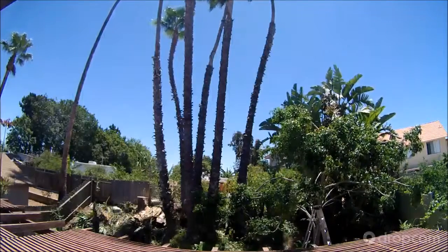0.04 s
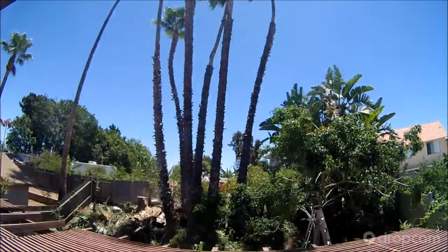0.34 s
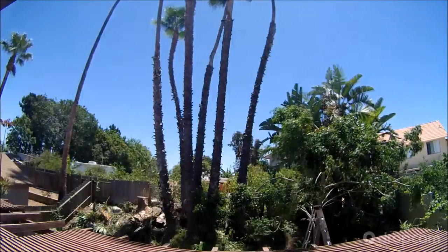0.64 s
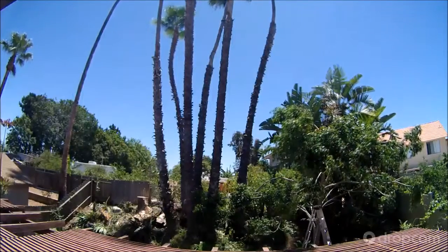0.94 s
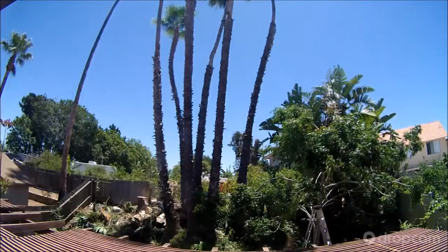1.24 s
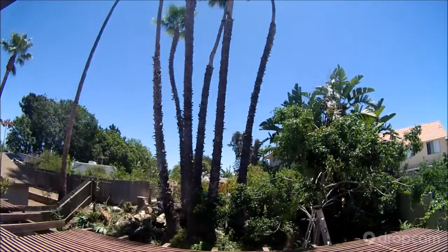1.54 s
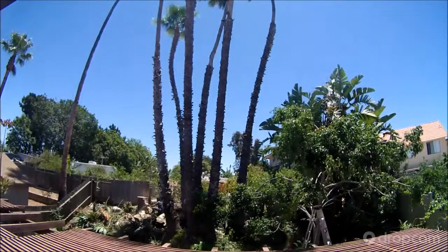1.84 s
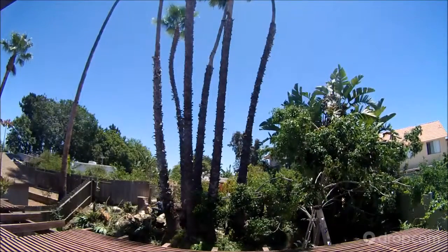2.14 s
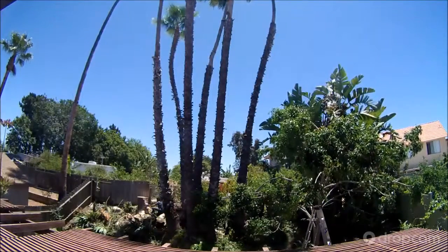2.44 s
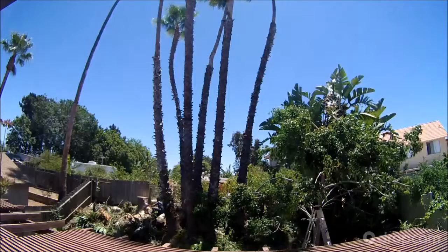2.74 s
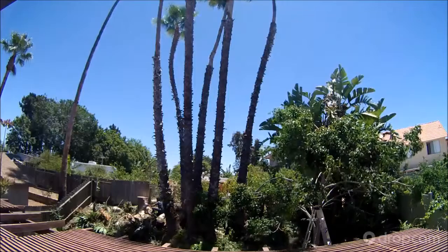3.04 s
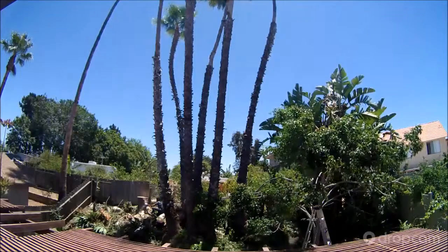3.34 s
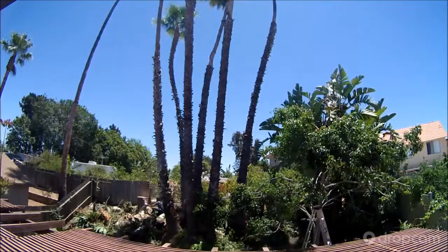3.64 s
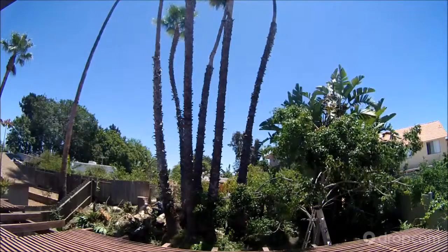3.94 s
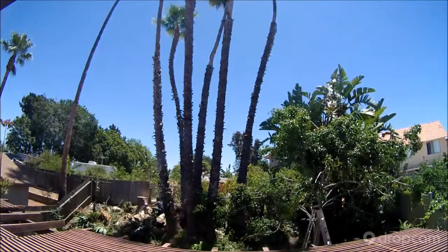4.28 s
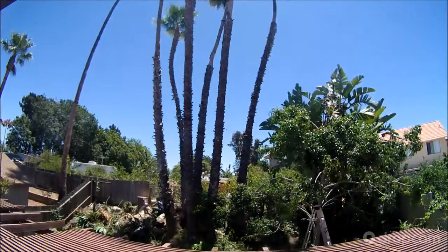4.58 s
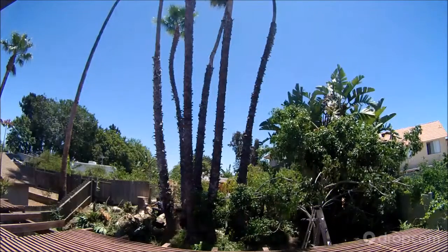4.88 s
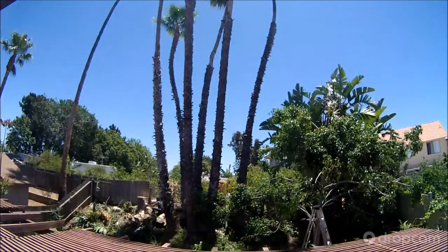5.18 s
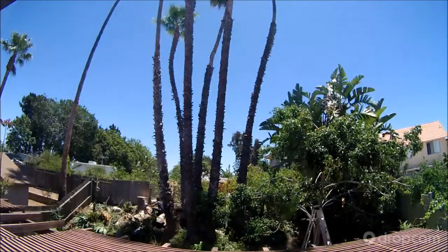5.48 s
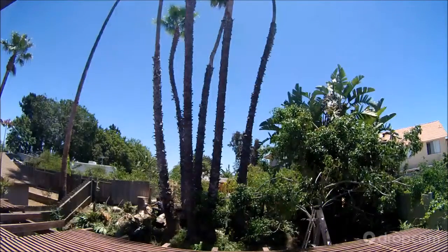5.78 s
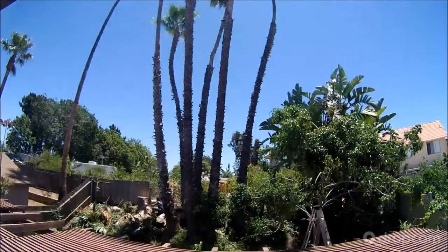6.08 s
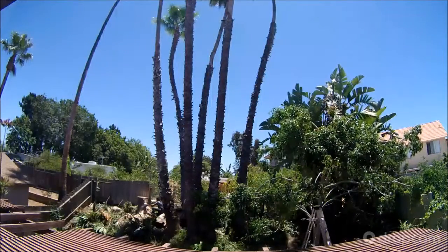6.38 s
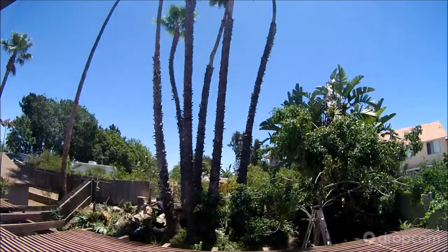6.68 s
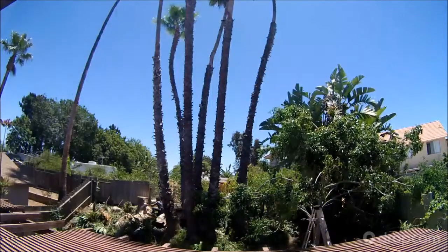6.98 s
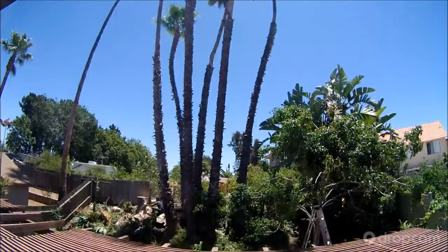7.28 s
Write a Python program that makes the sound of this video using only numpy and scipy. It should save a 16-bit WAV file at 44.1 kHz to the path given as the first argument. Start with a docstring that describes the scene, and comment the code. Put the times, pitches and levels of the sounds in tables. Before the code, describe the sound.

After a moment of faint outdoor air, a two-stroke chainsaw bursts in at high revs from some way off. Its pitch drops at once as the chain bites into wood, then it picks up and bogs down again and again, growing louder. The engine buzzes, rasps and sputters over the tearing of the chain. The microphone stays in one spot in a back yard, where fences and walls add a short echo.

```python
"""Chainsaw in a back yard

Heard from some way off, a two-stroke saw bursts in at high revs, bogs down in the wood and picks up
again and again. Each firing is a pop in the muffler: the low orders sing, the upper ones rasp, and the
chain tears through the wood. On the way to the microphone, fences, walls and trees scatter the sound
and smear it whenever the speed changes quickly."""
import sys
import numpy as np
from scipy import signal
from scipy.fft import rfft, irfft, next_fast_len
from scipy.io import wavfile
from scipy.ndimage import uniform_filter1d, map_coordinates

SR = 44100
rng = np.random.default_rng(int(sys.argv[2]) if len(sys.argv) > 2 else 0)


def master_out(mix):
    """Clip the mix to full scale and print it as 16-bit PCM to the path in sys.argv[1]."""
    frames = np.transpose(np.atleast_2d(mix))
    ceiling = np.clip(frames, -1, 1)
    pcm = np.round(ceiling * 32767).astype(np.int16)
    wavfile.write(sys.argv[1], SR, pcm)


N = 327222

START_S, ATTACK_S, FLYWHEEL_S, CRUISE_HZ = 0.4, 0.039, .085, 160
# Crank speed, one firing a turn: (time [s], firing rate [Hz])
CRANK_SPEED = [(0.4, 213.9), (0.63, 154.3), (0.89, 132.8), (1.31, 148.1), (1.7, 134.0), (1.94, 143.7),
               (2.25, 144.4), (2.77, 171.5), (3.13, 176.7), (3.61, 156.5), (3.88, 150.7), (4.23, 167.8),
               (4.34, 156.8), (4.45, 124.8), (4.66, 139.3), (4.84, 136.8), (5.0, 144.7), (5.18, 142.5),
               (5.34, 164.1), (5.46, 170.9), (5.73, 169.8), (6.08, 191.3), (6.27, 197.0), (6.5, 194.3),
               (6.62, 177.3), (6.83, 163.4), (7.08, 176.9), (7.24, 150.9), (7.42, 144.9)]
# Base level of the saw from across the yard, swelling through the first cut: (time [s], level [dB])
SAW_LEVEL = [(0.43, -60.5), (0.8, -58.5), (1.1, -53.0), (1.5, -50.5), (1.8, -48), (2.1, -45.5),
             (2.35, -44.5), (2.7, -41), (3.25, -40), (3.65, -42), (4.3, -42), (4.7, -45.0), (4.95, -43),
             (5.15, -43.5), (5.35, -41.0), (5.7, -41), (5.9, -38), (6.6, -38.0), (7.1, -39), (7.42, -41.5)]
def chainsaw():
    """The saw, some way off: all its parts follow one crank and one base level."""
    speed = smoothed(curves(CRANK_SPEED)[0], FLYWHEEL_S)
    octaves = np.log2(speed / CRUISE_HZ)  # the parts grow louder with the revs, in dB per octave
    level_db, = curves(SAW_LEVEL)
    rough = roughness()
    turns = crank(speed, rough)
    note = exhaust_note(turns, rough, order_levels(speed, level_db + 8 * octaves, rough))
    rasp = amp(level_db - 2.21 + .8 * octaves) * exhaust_rasp(turns, rough)
    cutting = amp(level_db - 5.5 + 6.5 * octaves) * chain(turns, rough)
    gas = amp(level_db + 3) * gas_rush(turns, rough)
    low_end = amp(level_db - 28 + 9 * octaves) * rumble()
    running = np.clip((np.arange(N) / SR - START_S) / ATTACK_S, 0, 1)
    return running * (note + rasp + cutting + gas + low_end)


# The chain bites deep into the wood: (middle [s], length [s], added roughness [0-1])
DEEP_BITES = [(.63, 0.45, .38), (1.528, 0.22, .12), (2.422, 0.48, .21), (3.456, 0.25, 0.14),
              (4.43, 0.54, .34), (5.299, 0.24, .26), (5.75, 0.57, 0.07), (6.643, 0.27, 0.23),
              (7.234, 0.2, 0.36)]
def roughness(free_running=.25):
    """Uneven burning, 0-1: it swells and fades with each bite."""
    t = np.arange(N) / SR
    bites = sum(depth * np.exp(-(2 * (t - middle) / length) ** 2)
                for middle, length, depth in DEEP_BITES)
    return np.clip(free_running + bites, .02, 1)


def crank(speed, rough):
    """Turns of the crank; its speed wanders a little and uneven burning shakes it."""
    shake = .0011 * wobble(16) + .012 * rough ** 2 * wobble(60)
    return np.cumsum(speed * (1 + shake)) / SR


# Broad colour of the exhaust note at the microphone: (frequency [Hz], gain [dB])
NOTE_COLOUR = [(130, -24.5), (190, -17), (250, -17.5), (285, -9.5), (320, -19.5), (380, -2.5), (440, -16),
               (560, -11), (640, -13.5), (780, -4), (900, -16.5), (1200, -14)]
# Narrow peaks and notches of muffler and yard: (frequency [Hz], width [Hz], gain [dB])
HONK_RESONANCES = [(350.5, 4.9, 7), (483, 12, -13), (503.1, 18.4, 15.5), (595.6, 15, -11), (636.6, 35, 11),
                   (681.7, 6.3, 9), (728.4, 19.5, 12), (780, 24, 6.5), (866, 7.7, 12)]
# Lift of the band around the main honk: (time [s], gain [dB])
HONK_LIFT = [(.45, -3), (.9, 4), (1.2, 6), (1.4, 6), (1.7, 0.5), (2.22, 2.5), (2.45, -3), (2.9, -2.5),
             (3.6, 1.5), (3.85, .5), (4.3, -2), (4.55, 4.5), (4.85, 9.5), (5.1, 6), (5.3, -4), (5.6, -2.5),
             (6.4, 1.5), (6.65, -5), (7.2, -4), (7.42, 2.5)]
def order_levels(speed, drive_db, rough, honk_hz=770, spread_hz=200, ring_up_s=0.023, flutter_db=7.5):
    """dB of the six low orders: each flutters, and honks or fades as it glides through a resonance."""
    honk_db, = curves(HONK_LIFT)
    levels = []
    for order in range(1, 7):
        hz = order * speed
        band_db = honk_db * np.exp(-((hz - honk_hz) / spread_hz) ** 2)
        colour_db = along(NOTE_COLOUR, hz) + lifted(HONK_RESONANCES, hz) + band_db
        levels.append(drive_db + smoothed(colour_db, ring_up_s) + flutter_db * rough * wobble(18))
    return levels


def exhaust_note(turns, rough, orders_db):
    """The low orders as clean tones; they sputter and lose their pitch when the engine labours."""
    tones = 0
    for order, db in enumerate(orders_db, 1):
        phase = 2 * np.pi * (order * turns + rng.random()) + 2.2 * rough ** 2 * wobble(50)
        sputter = 1 + (.08 + .6 * rough) * np.tanh(wobble(48))
        tones = tones + amp(db) * sputter * np.sqrt(2) * np.sin(phase)
    return yard(tones, near_db=-32, far_db=-22, near_t60=.15)


# Upper exhaust orders from across the yard: (frequency [Hz], relative level [dB])
RASP_SPECTRUM = [(800, 5), (1030, 1.5), (1170, -3.5), (1330, -3), (1470, -5.5), (1620, 0.5), (1900, -0.5),
                 (2500, -3.5), (2800, -12), (3200, -7.5), (4000, -20.5), (5200, -39), (7400, -45.5)]
# Muffler and housing resonances: (frequency [Hz], width [Hz], gain [dB])
SHELL_RESONANCES = [(1134, 33, 8), (1555, 83, 3.5), (1884, 95, 3.5), (2115, 80, 6), (2514, 70, 5)]
def exhaust_rasp(turns, rough, bite_db=1.5, grind_db=4):
    """Pops and turbulent puffs ring the muffler shell; rough running swells the rasp in short bursts."""
    puff_share = rough ** 3
    firings = pops(turns, rough, jitter_turns=.003, scatter_db=2.5)
    turbulence = filtered(puffs(turns, fade=1.6), lambda hz: hz > 900)
    blast = np.sqrt(1 - puff_share) * firings + np.sqrt(puff_share) * turbulence
    rasp = filtered(blast, lambda hz: amp(along(RASP_SPECTRUM, hz) + lifted(SHELL_RESONANCES, hz)))
    heard = shifting_paths(rasp, near_db=7, far_db=-6, near_t60=.1, sway=.7)
    return heard * amp(rough * (bite_db + grind_db * wobble(50)))


# The chain in the wood, its top dull at this distance: (frequency [Hz], relative level [dB])
CHAIN_SPECTRUM = [(1500, -8), (2800, -6.5), (4000, -4), (4600, -8.5), (5050, -4.5), (5400, -13.5),
                  (5900, -17), (7000, -25.5), (7500, -39)]
def chain(turns, rough):
    """Cutters and drive links clatter with every power stroke and hiss as they bite."""
    clatter = pops(turns, rough, jitter_turns=.009, scatter_db=6)
    hiss = (.15 + rough) * puffs(turns, fade=2)
    cutting = coloured(clatter + hiss, CHAIN_SPECTRUM)
    heard = shifting_paths(cutting, near_db=11, far_db=4.0, near_t60=0.19, sway=0.96)
    return heard * amp(0.98 * wobble(45))


# Gas rushing in the muffler: (frequency [Hz], relative level [dB])
GAS_SPECTRUM = [(150, -20), (280, -6.5), (390, -10), (450, -6), (520, -4.5), (660, -2.5), (765, 9),
                (860, -1.5), (1100, -13), (2500, -36)]
def gas_rush(turns, rough):
    """Gas puffs through the muffler once a turn, louder as the engine labours."""
    return rough ** 2 * coloured(puffs(turns, fade=2.3), GAS_SPECTRUM)


# Low end of the saw at the microphone: (frequency [Hz], relative level [dB])
RUMBLE_SPECTRUM = [(20, -22.5), (45, -6.5), (90, -8.5), (140, -4.5), (300, -20.5), (800, -59)]
def rumble(swing_db=3):
    """Low noise wavers under the exhaust note."""
    return amp(swing_db * wobble(15)) * coloured(rng.standard_normal(N), RUMBLE_SPECTRUM)


def pops(turns, rough, jitter_turns, scatter_db, first_order=7, last_order=50):
    """One sharp pulse a turn, made of the given orders; rough running scatters its timing and size."""
    firing = np.round(turns).astype(int)
    late, size = rng.standard_normal((firing[-1] + 1, 2))[firing].T
    angle = np.pi * (turns + jitter_turns * rough * late)
    # closed form of a sum of equally strong harmonics
    pulse = (np.sin((2 * last_order + 1) * angle) - np.sin((2 * first_order - 1) * angle)) / np.sin(angle)
    return unit(pulse * amp(scatter_db * rough * size))


def puffs(turns, fade):
    """Noise that bursts as the exhaust port opens and fades through each turn."""
    return unit(rng.standard_normal(N) * np.exp(-fade * (turns % 1)))


def shifting_paths(x, near_db, far_db, near_t60, sway, wall_s=.038, wall_db=-6.5):
    """The saw moves in the hands, so its sound drifts between two sets of paths to the microphone."""
    angle = sway * wobble(22)
    one, other = (yard(x, near_db, far_db, near_t60) for _ in range(2))
    heard = np.cos(angle) * one + np.sin(angle) * other
    # while the speed glides, the house wall's echo lags in pitch and beats against the direct sound
    echo = amp(wall_db) * np.pad(heard, (round(wall_s * SR), 0))[:N]
    return unit(heard + echo)


# Tail from the houses beyond the yard: (frequency [Hz], time to fall 60 dB [s])
FAR_DECAY = [(150, 0.38), (800, 0.7), (3000, 0.33), (7000, 0.033)]
def yard(x, near_db, far_db, near_t60):
    """Direct sound, quick scatter from nearby trunks and fences, and a tail from the houses beyond."""
    hz, t, noise = signal.stft(rng.standard_normal(SR // 2), SR, nperseg=256)
    near = unit(amp(-60 * t / near_t60) * (t > 0))
    build_up = 1 - np.exp(-t / 0.082)
    far = unit(amp(-60 * t / along(FAR_DECAY, hz)[:, None]) * build_up)
    envelope = np.hypot(amp(near_db) * near, amp(far_db) * far)
    tail = signal.istft(noise * envelope, SR, nperseg=256)[1]
    return x + signal.fftconvolve(x, tail / np.sqrt(len(tail)))[:N]


# Open air around the microphone: (frequency [Hz], relative level [dB])
AIR_SPECTRUM = [(15, -57.5), (25, -32), (350, -15), (443, -10), (488, -12), (524, -12.5), (5640, -23.5),
                (7320, -53), (9520, -70), (16100, -120)]
# Loudness of that air: (time [s], level [dB])
AIR_LEVEL = [(0, -68), (.13, -68), (.27, -72), (.45, -68)]
def outdoor_air():
    """A faint wash of noise that dips briefly before the saw comes in."""
    air_db, = curves(AIR_LEVEL)
    return amp(air_db) * coloured(rng.standard_normal(N), AIR_SPECTRUM)


def amp(db):
    """Decibels to gain."""
    return 10 ** (np.asarray(db) / 20)


def unit(x):
    """Scale to rms 1."""
    return x / np.sqrt(np.mean(x ** 2) + 1e-20)


def along(points, hz):
    """(Hz, value) points read on a log axis."""
    frequencies, values = np.transpose(points)
    return np.interp(np.log(hz + 1), np.log(frequencies + 1), values)


def lifted(resonances, hz):
    """dB of lift at hz from (Hz, width Hz, dB) peaks and notches."""
    return sum(db / (1 + (2 * (hz - centre) / width) ** 2) for centre, width, db in resonances)


def curves(rows):
    """One value per sample for each column after the time."""
    times, *columns = np.transpose(rows)
    return [np.interp(np.arange(N) / SR, times, column) for column in columns]


def smoothed(x, seconds):
    """Running mean over the given time."""
    return uniform_filter1d(x, size=max(1, round(seconds * SR)), mode="nearest")


def wobble(per_s):
    """A smooth random curve, per_s knots a second."""
    knots = rng.standard_normal(int(N * per_s / SR) + 4)
    return map_coordinates(knots, [np.arange(N) * per_s / SR])


def filtered(x, response):
    """x through a gain given as a function of frequency."""
    size = next_fast_len(N + SR // 2)
    return irfft(rfft(x, size) * response(np.fft.rfftfreq(size, 1 / SR)), size)[:N]


def coloured(x, spectrum):
    """x shaped by a (Hz, dB) spectrum, at rms 1."""
    return unit(filtered(x, lambda hz: amp(along(spectrum, hz))))


def scene():
    """The saw over faint outdoor air, in mono from one spot in the yard."""
    return (chainsaw() + outdoor_air())[None]


def record(dry, top_hz=7400):
    """The camera's microphone track keeps nothing above its band limit."""
    return np.array([filtered(channel, lambda hz: hz < top_hz) for channel in dry])


dry = scene()
out = record(dry)
master_out(out)
```